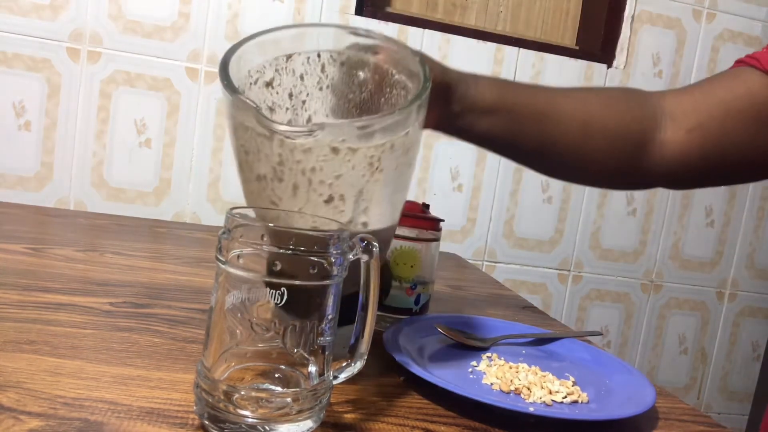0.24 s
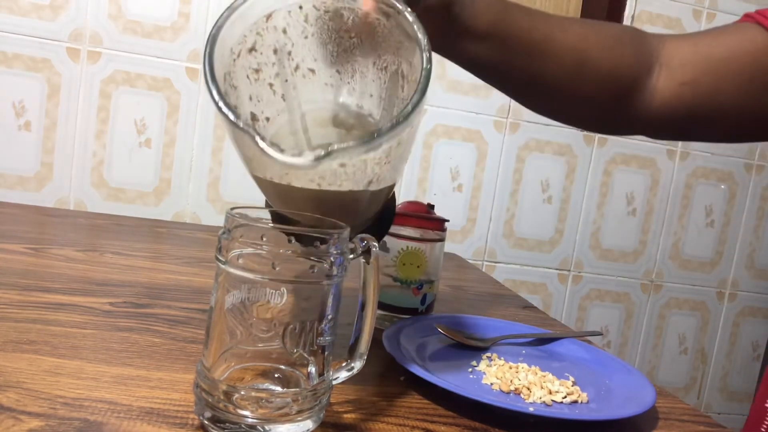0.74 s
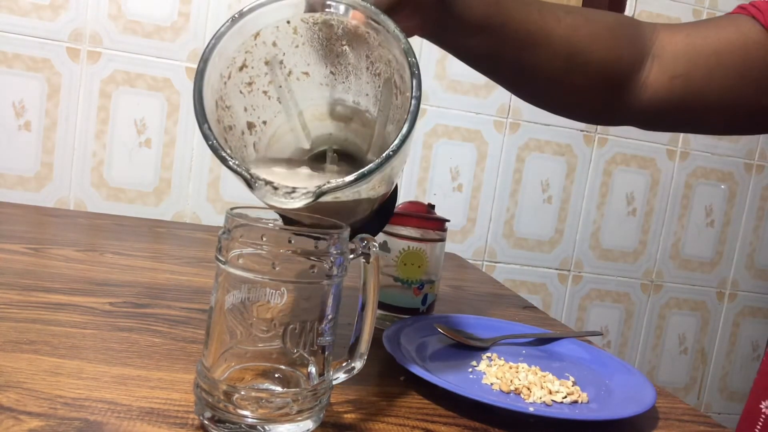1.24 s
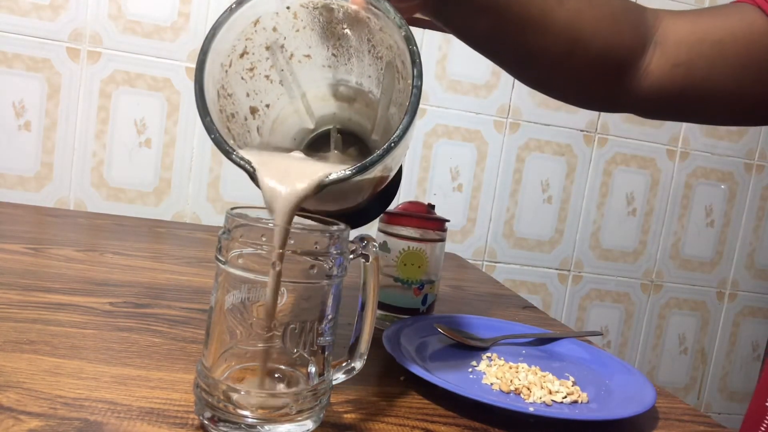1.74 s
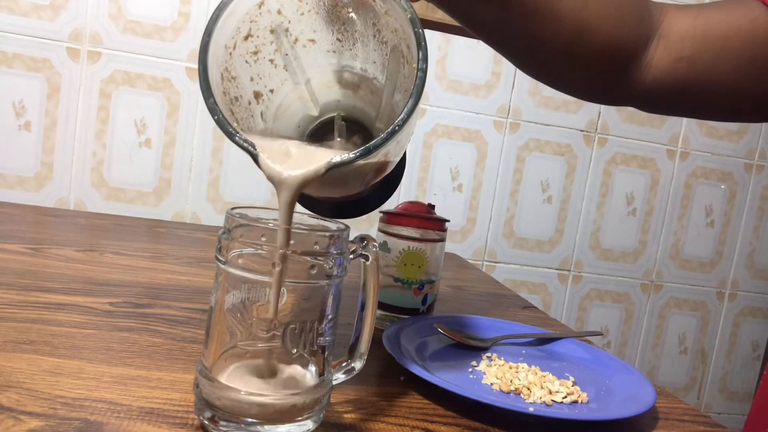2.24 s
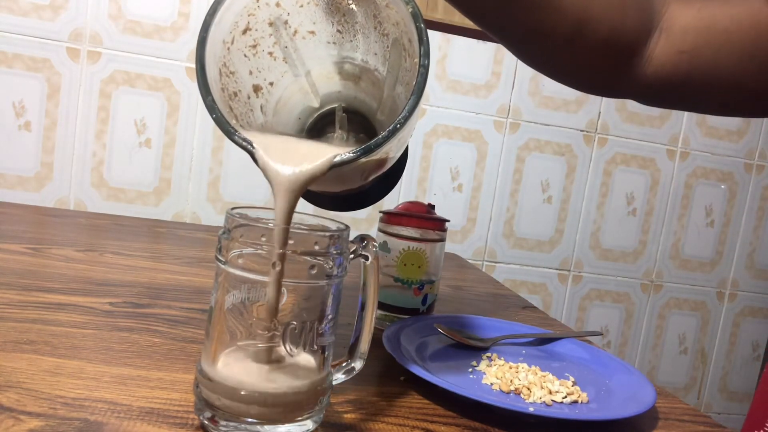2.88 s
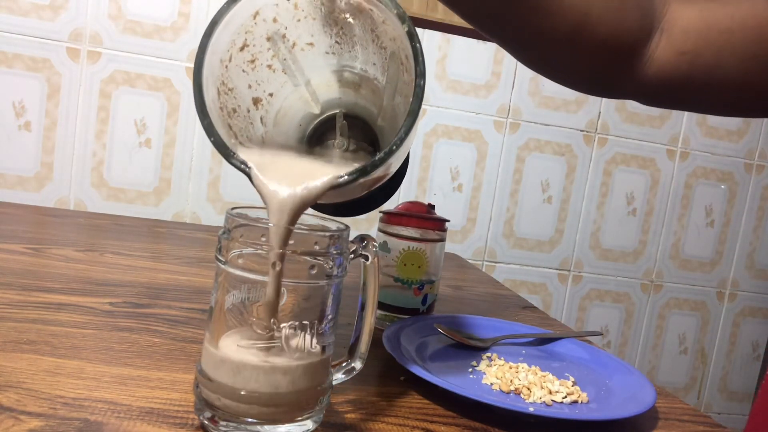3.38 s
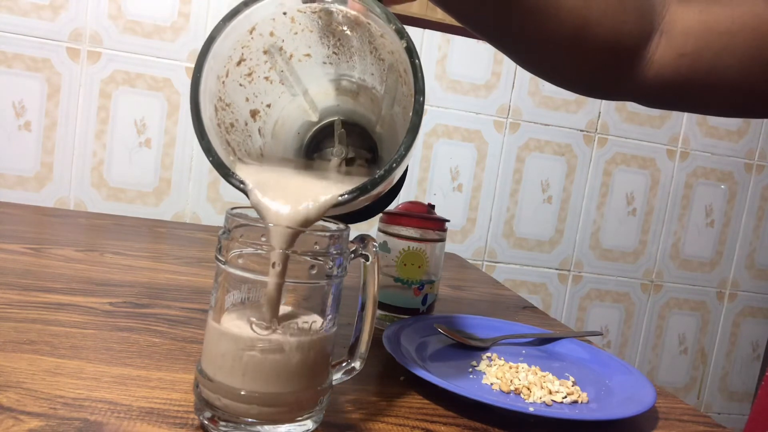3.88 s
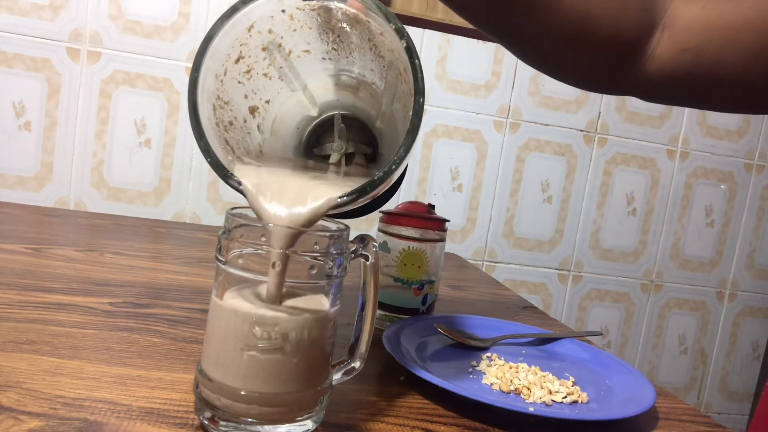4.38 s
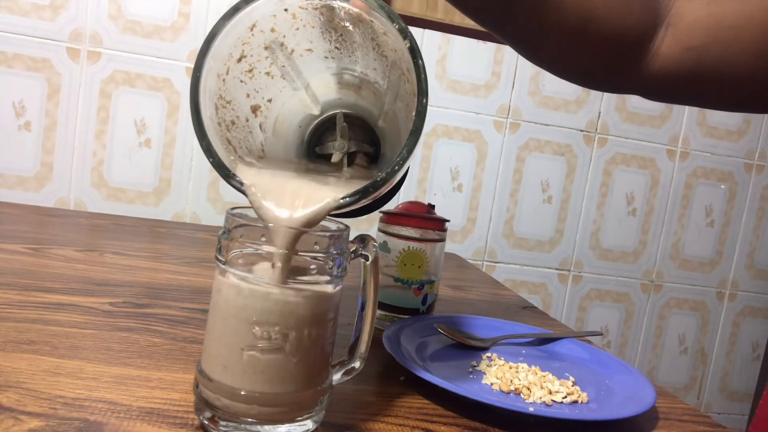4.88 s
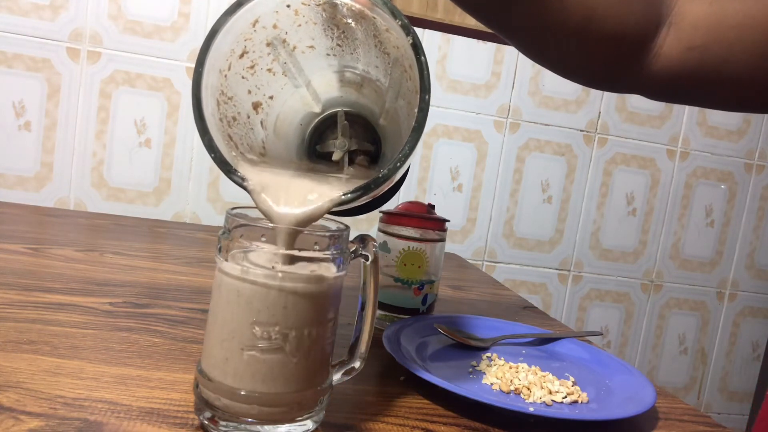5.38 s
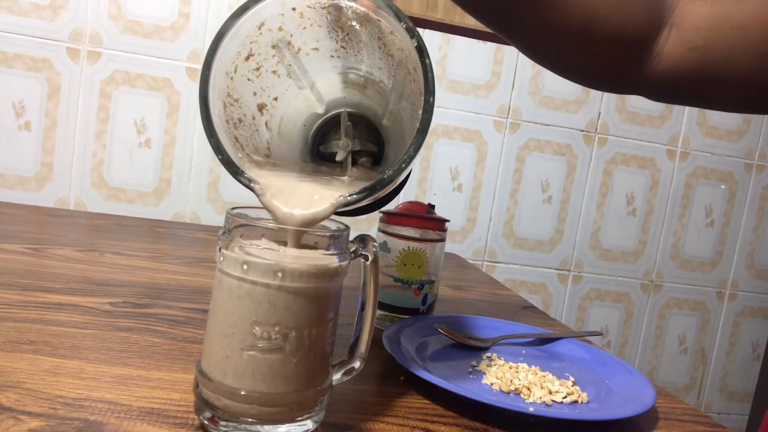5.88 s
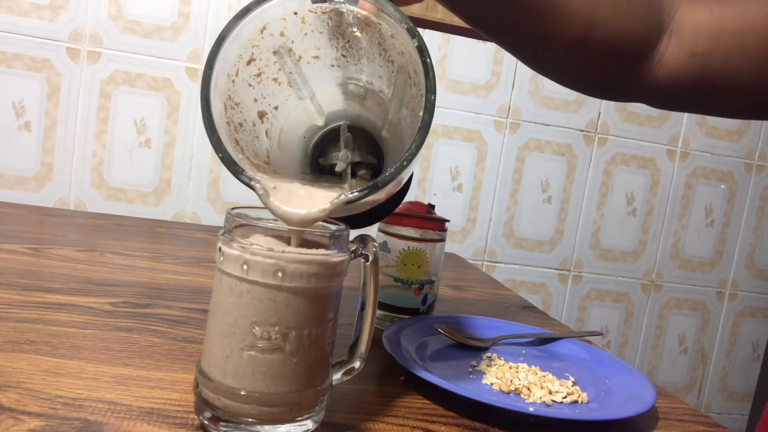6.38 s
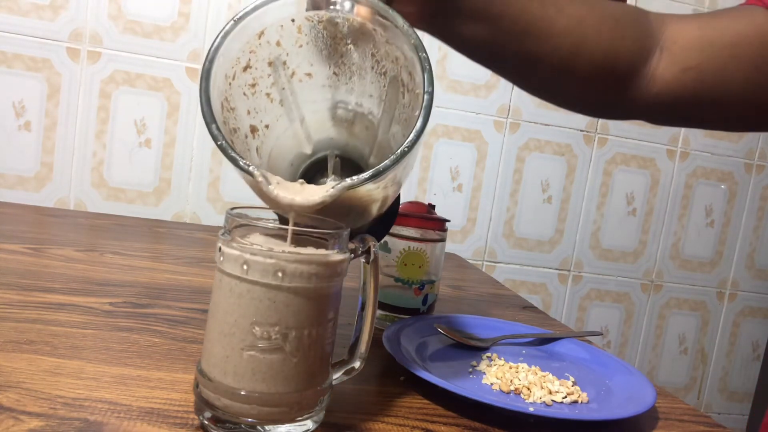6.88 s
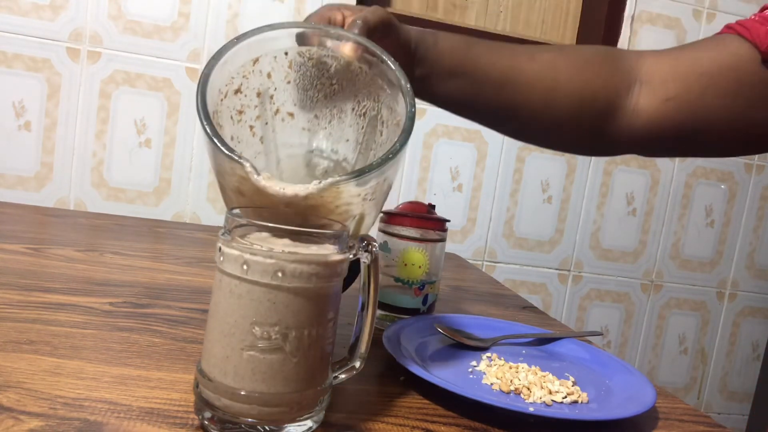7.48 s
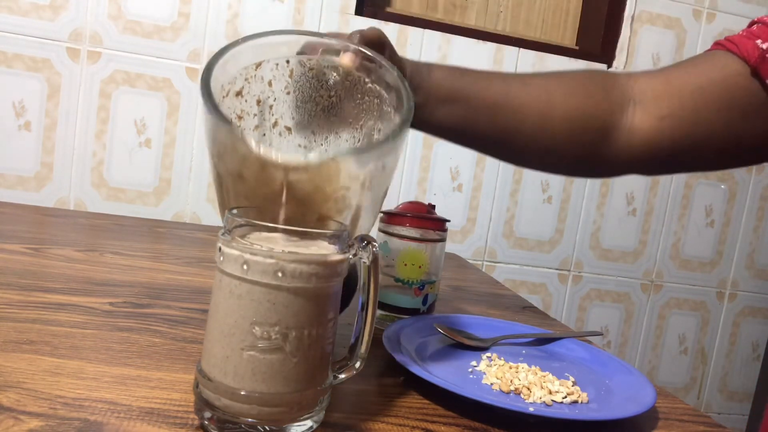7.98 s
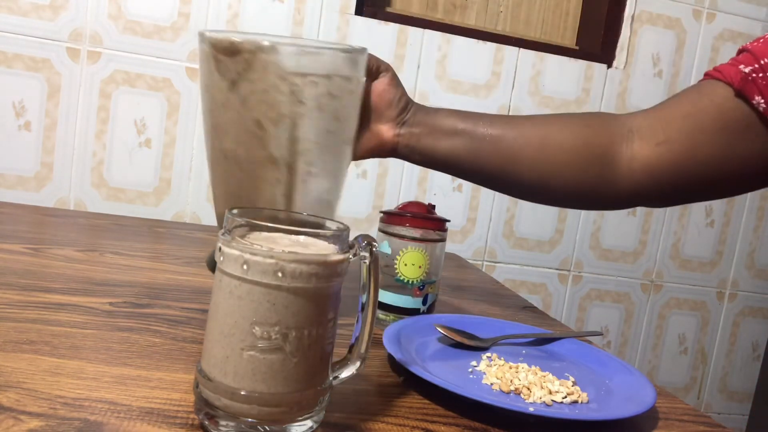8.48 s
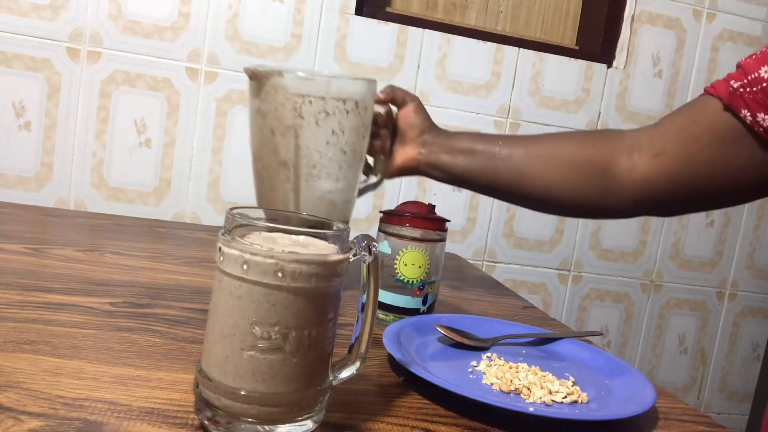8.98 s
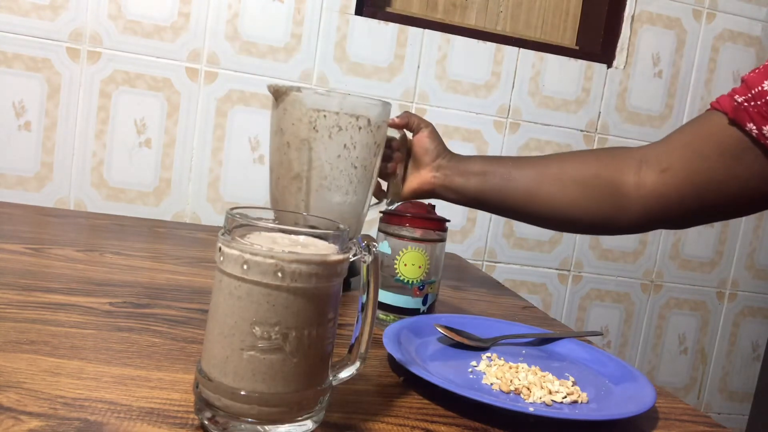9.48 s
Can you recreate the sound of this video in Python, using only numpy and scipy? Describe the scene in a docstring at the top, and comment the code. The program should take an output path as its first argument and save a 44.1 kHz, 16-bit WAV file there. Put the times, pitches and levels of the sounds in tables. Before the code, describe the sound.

In a small tiled kitchen with a steady fridge hum, a heavy glass jug bumps a wooden table, with light glass rattle. Thick drink pours into a glass mug: snapping bubbles, strong hollow gulps, then softer glugs that fade as it fills. A faint low drone remains. Later the jug is lowered with a few knocks and glassy clinks, then set down in a clatter. Close microphone, short bright room echo.

```python
"""A thick shake pours from a blender jug into a glass mug on a wooden table, heard in a tiled kitchen.
Large air pockets in the stream snap as torn fizz and gulp as short swelling notes; small bubbles simmer,
glug and pip, and the stream adds a low drone of filtered noise. The jug knocks as it is lifted, tipped and
set down: each blow is a filtered force that rings table and jug and sets the glass chattering.
Behind are a fridge hum of wavering sine lines, room air and faint far chirps, both made of noise."""
import sys
import numpy as np
from scipy import signal
from scipy.fft import rfft, irfft
from scipy.io import wavfile

SR = 44100
rng = np.random.default_rng(int(sys.argv[2]) if len(sys.argv) > 2 else 0)


def generate_wav(sig):
    """Save sig (samples, or channels by samples) to the path in sys.argv[1] as 16-bit PCM at SR."""
    pcm = np.round(np.clip(np.atleast_2d(sig).T, -1, 1) * 32767).astype(np.int16)
    wavfile.write(sys.argv[1], SR, pcm)


N = 429426
LEAD = SR // 5  # samples of run-in ahead of time zero
SIZE = 32768  # samples in one knock or room response
T, HZ = np.arange(SIZE) / SR, np.fft.rfftfreq(SIZE, 1 / SR)
EDGE_HZ = 15900  # upper band limit

# Levels in the tables are relative within their own layer unless marked rms.
# fridge motor lines: pitch_hz [Hz], level_db [dB rms]
FRIDGE_LINES = [(147.1, -59), (196.2, -56.5), (217, -57.5), (237, -52), (294.3, -48.5), (344, -63),
                (402, -57), (441.4, -41), (490.5, -61), (539.6, -61), (688, -60), (806, -56), (834, -61),
                (1031, -67), (2013, -78), (2209, -68.5), (3339, -70), (3730, -71.5)]
# spectrum of the still room air: frequency_hz [Hz], level_db [dB per Hz]
AIR_SPECTRUM = [(15, -71), (25, -28), (76, -7.5), (180, -7), (285, -7.5), (373, -9), (439, -6.5),
                (503, -8.5), (591, -11.5), (818, -12.5), (887, -13), (1160, -20), (5430, -30), (14800, -42),
                (16000, -41)]
AIR_DB = -44.5  # rms
# faint far chirps: start_s [s], level_db [dB rms at full swell], length_s [s]
FAR_CHIRPS = [(4.01, -62, .25), (4.825, -59.5, 0.32), (5.947, -64, .2), (8.736, -64, 0.26)]

# decay of the tiled room: frequency_hz [Hz], t60_s [s]
ROOM_DECAY = [(100, 0.56), (230, 0.39), (600, 0.7), (1500, 0.85), (4000, 0.75), (8000, 0.76), (15000, 0.23)]
# strength of the room tail: frequency_hz [Hz], level_db [dB re direct sound]
ROOM_LEVEL = [(80, 6.5), (250, -2), (450, 1.5), (800, -7.5), (2000, -3.5), (6000, -10), (15000, -9)]
# near echoes from table and wall: delay_s [s], level_db [dB re direct sound]
NEAR_ECHOES = [(.0045, -26), (.0088, -15), (0.0173, -33)]

# blows of the jug: start_s [s], contact [name], level_db [dB], hardness_hz [Hz, top corner],
# chatter_db [dB], flight_s [s until the jolted glass lands]
JUG_BLOWS = [(-0.06, "bump", -10, 1610, -19.5, .02), (0.258, "tilt", -21, 1000, -35, 0.0015),
             (0.271, "tilt", -6, 388, -21.5, 0.0087), (0.435, "bump", -5.5, 701.3, -17, 0.0095),
             (0.458, "bump", -1.5, 467, -15, 0.0039), (0.477, "bump", -0.5, 720, -13.5, 0.011),
             (0.579, "bump", -14.5, 694, -23.5, 0.0061), (0.702, "bump", -14, 463, -48, 0.0056),
             (1.118, "tilt", -5.5, 363, -24, .018), (1.202, "tilt", -9.5, 700, -22.5, .011),
             (1.307, "tilt", -9, 540, -29.5, .012), (3.912, "rim", -13, 408, -51, 0.0042),
             (6.711, "lower", -12.5, 302.2, -42, 0.0063), (6.721, "lower", -7.5, 765, -20.5, 0.0065),
             (6.748, "lower", -14, 580, -18.5, 0.0033), (6.996, "rim", -3.5, 948, -22, .048),
             (7.150, "rim", -5.5, 831, -19.5, .034), (7.261, "rim", -13.5, 1230, -35, 0.0039),
             (7.337, "rim", -15.5, 1110, -52, 0.0079), (9.122, "stand", -6.5, 2680, -14, 0.026),
             (9.158, "stand", -8, 300, -28, 0.0053), (9.264, "stand", -7.5, 3200, -15.5, .029),
             (9.327, "stand", -8.5, 1420, -13, 0.013), (9.342, "stand", -10.5, 689.7, -19, 0.016),
             (9.395, "stand", -20, 450, -49, .005), (9.498, "stand", -14.5, 1210, -25, .011)]
# how the jug is met, by contact name: lightness_hz [Hz, bottom corner], boom_db [dB], jug_ring_db [dB]
CONTACT_KINDS = {"tilt": (280, 4, -12), "bump": (303, 4.2, -14), "lower": (240, 6.6, -18),
                 "rim": (227, -2, 15.6), "stand": (91, -2.5, 1)}
# modes of the table top: pitch_hz [Hz], level_db [dB], t60_s [s]
TABLE_MODES = [(83.4, 4.5, 0.15), (105.4, -1, 0.3), (115, -2, 0.24), (149.8, 6.5, 0.32), (156.9, 6.5, 0.26),
               (193.2, 2, 0.3), (242.6, 1.5, 0.056), (276.8, 1, 0.3), (327, 2, 0.091), (355.3, 6.5, 0.16),
               (389, -1.5, 0.15), (400, -5.5, 0.07), (489, 6.5, 0.14), (544.5, 0.5, 0.23), (610, -39, 0.29),
               (729, -4.5, 0.47)]
# hollow note of the half-empty jug: pitch_hz [Hz], level_db [dB], t60_s [s]
JUG_BOOM = [(233.6, 10.5, 0.18)]
# modes of the heavy jug: pitch_hz [Hz], level_db [dB], t60_s [s]
JUG_MODES = [(624, 3, 0.036), (1014, -11, 0.32), (1049, -4, 0.088), (1110, -15, 0.29), (1390, -35, 0.066),
             (1710, -28, .1), (1700, -32, .1), (2680, 0, 0.057), (3020, 11, 0.028), (5000, 7, 0.054)]
# modes of glass and jug in the chatter: pitch_hz [Hz], level_db [dB], t60_s [s]
GLASS_MODES = [(2458, 4, 0.054), (2600, -10, 0.1), (2669, 4.5, 0.13), (3186, -1.5, 0.19), (3540, -8, .08),
               (3960, 7, 0.078), (3950, 0, 0.078), (4200, -35, 0.069), (4627, 14, 0.034),
               (4760, -17, 0.045), (5750, -21, 0.085), (5220, 4, 0.053), (6140, -7.5, 0.19),
               (6610, -6.5, 0.11), (7430, -1, 0.12), (7850, -2.5, 0.095), (8800, -16.5, 0.075),
               (9200, -20, 0.14), (9620, -53, .08), (10220, -4, 0.066), (10900, -8, 0.059),
               (13100, -13, .07), (12930, -14, 0.12), (13190, -19, 0.057)]
# colour of a hard glass contact: frequency_hz [Hz], level_db [dB]
CRACK_SPECTRUM = [(900, 3), (2000, 3.5), (3900, 6.5), (4300, -19), (4650, 6), (5400, 7), (6200, -5),
                  (7500, -2), (9500, -6.5), (13300, -25), (15000, -45)]
# the jolted glass grazes its support until it lands, then rebounds, ever weaker
GRAZE_GAP_S, GRAZE_DB, BOUNCE_GAP_S, BOUNCE_LOSS_DB = .012, -8, .009, 10

# modes of the air in the mug and its wall: pitch_hz [Hz], level_db [dB], t60_s [s]
MUG_MODES = [(685, -14, 0.093), (1307, 14, 0.016), (1514, 12, 0.017), (2000, 5, 0.022), (2650, -30, 0.013),
             (3240, 2, 0.043), (6040, 0, 0.018)]
# large bursting pockets: start_s [s], snap_db [dB], snap_centre_hz [Hz], snap_length_s [s],
# gulp_db [dB peak], gulp_pitch_hz [Hz], swell_s [s]
AIR_POCKETS = [(2.093, -23.5, 3170, 0.0023, -31, 682, 0.0048),
               (2.408, -33.5, 2740, 0.003, -30.5, 732, 0.0042),
               (2.544, -43.5, 3130, .0043, -25, 766, .0028),
               (2.609, -27.5, 3840, 0.0055, -8.5, 818, 0.0022),
               (2.627, -26, 5440, 0.0045, -6, 725.6, 0.0056),
               (2.727, -39.5, 3950, .0024, -6.5, 747, 0.0038),
               (2.7845, -39, 2830, 0.0023, -3.5, 722, 0.0022), (2.896, -50, 2500, .005, -6.5, 740, 0.0017),
               (2.9588, -20, 4970, 0.0015, -1, 780, 0.0016), (3.235, -44.5, 3830, .003, -23, 827, 0.0026),
               (3.278, -45.5, 3380, 0.0029, -17.5, 783, 0.001), (3.3424, -18, 5470, 0.0026, 1, 807, 0.0028),
               (3.578, -49, 2990, .002, -15.5, 858, 0.0042), (3.646, -32, 5700, 0.0024, -21, 997, 0.0016),
               (3.848, -43.5, 4870, .003, -20, 880, 0.0011),
               (4.244, -35.5, 3080, 0.0038, -22.5, 1000, 0.0012),
               (4.398, -51, 3000, 0.0022, -34, 1070, 0.0015), (4.582, -47, 8000, 0.0023, -41, 1120, 0.0016)]
# small bubbles with a clean high pip: start_s [s], level_db [dB peak], pitch_hz [Hz]
SMALL_PIPS = [(1.989, -30, 2020), (2.282, -29, 5520), (2.325, -34.5, 3250)]
# the stream reaches the mug, bubbles for a while, and runs on smoothly until the jug is raised
POUR_START_S, BUBBLING_S, POUR_END_S = 2.1, 2.5, 6.15
# the air above the drink shortens, so its note rises and the mug rings less
EMPTY_NOTE_HZ, FILL_SHARE_PER_S, NOTE_SCATTER = 673, 0.168, .04
MUG_RING_DB, MUG_DAMPING_DB_PER_S = -30, 6
# as the drink deepens, gulps gain a lower second note that sinks
UNDERTONE_FROM_S, UNDERTONE_GROW_S, UNDERTONE_SWELL_S = 2.68, 0.66, 0.0035
UNDERTONE_HZ, UNDERTONE_SINK_OCTAVES_PER_S, UNDERTONE_DB = 658, 1.2, -11


def amp(db):
    """Turns decibels into gain."""
    return 10 ** (np.asarray(db) / 20)


def unit(x):
    """Scales a sound to rms 1."""
    return x / np.sqrt(np.mean(x ** 2) + 1e-20)


def read(points, hz):
    """Reads a table of values on a log-frequency axis."""
    f, value = np.transpose(points)
    return np.interp(np.log(hz + 1), np.log(f + 1), value)


def add(mix, s, sound):
    """Mixes a sound in at time s; tracks begin LEAD samples early."""
    part = mix[max(round(s * SR) + LEAD, 0):][:len(sound)]
    part += sound[:len(part)]


def noise(gain_at):
    """Steady noise whose spectrum is a function of frequency."""
    length = 2 ** 19
    white = rfft(rng.standard_normal(length))
    return unit(irfft(white * gain_at(np.fft.rfftfreq(length, 1 / SR)))[:N])


def drift(rate):
    """Slow random wander between unit-variance points, 2 * rate of them a second."""
    knots = np.arange(int(N / SR * 2 * rate) + 2) / (2 * rate)
    return np.interp(np.arange(N) / SR, knots, rng.standard_normal(len(knots)))


def ringing(modes):
    """Spectrum of a struck set of decaying modes."""
    return rfft(sum(amp(db - 60 * T / t60) * np.cos(2 * np.pi * hz * T) for hz, db, t60 in modes))


def background(waver_hz=0.66, flutter_db=1.0):
    """Fridge lines, wavering slightly in pitch and level, over the still air of the room."""
    hum = np.zeros(N)
    for hz, db in FRIDGE_LINES:
        turns = np.cumsum(hz + waver_hz * drift(3)) / SR
        level = amp(db + flutter_db * drift(6))
        hum += level * np.sqrt(2) * np.sin(2 * np.pi * turns)
    return hum + amp(AIR_DB) * noise(lambda hz: amp(read(AIR_SPECTRUM, hz)))


def chirps(centre_hz=3340, width_hz=70):
    """Thin trembling chirps, far away: a narrow noise band swelled in and out."""
    level = np.zeros(N + LEAD)
    for s, db, length_s in FAR_CHIRPS:
        add(level, s, amp(db) * signal.windows.tukey(int(length_s * SR), .5))
    return level[LEAD:] * noise(lambda hz: 1 / (1 + ((hz - centre_hz) / width_hz) ** 2))


def kitchen(x, build_s=0.003):
    """Direct sound and a few near echoes, then a tiled-room tail that dies band by band."""
    hz, t, z = signal.stft(rng.standard_normal(SIZE), SR, nperseg=256)
    t60 = read(ROOM_DECAY, hz)[:, None]
    decay = amp(read(ROOM_LEVEL, hz)[:, None] - 60 * t / t60)
    even_energy = np.sqrt(2 * np.log(1000) / (t60 * SR))  # tail energy set by level, not by length
    tail = signal.istft(z * decay * even_energy, SR, nperseg=256)[1][:SIZE]
    response = tail * (1 - np.exp(-(T / build_s) ** 2))
    response[0] += 1  # direct path to the microphone
    for s, db in NEAR_ECHOES:
        response[round(s * SR)] += amp(db)
    return signal.oaconvolve(x, response)[LEAD:LEAD + N]


def knocks(level_db=32, table_db=-49, boom_db=-47, jug_db=-47, scatter_db=-2, scatter_t60=0.12,
           spread=0.1069, dull_hz=4800):
    """Each blow crosses the table as a bending wave, scatters off the edges, and rings table and jug."""
    out = np.zeros(N + LEAD)
    table = amp(table_db) * ringing(TABLE_MODES)
    boom = amp(boom_db) * ringing(JUG_BOOM)
    jug = amp(jug_db) * ringing(JUG_MODES)
    # bending waves arrive treble first: delay is spread * (1 / sqrt(f) - 1 / sqrt(SR / 2))
    bending = np.exp(-4j * np.pi * spread * (np.sqrt(HZ) - HZ / (2 * np.sqrt(SR / 2))))
    # wood soaks up the treble
    wood = (1 + 1j * HZ / 2500) / (1 + 1j * HZ / 900) / (1 + (HZ / dull_hz) ** 4)
    for s, contact, db, top_hz, _, _ in JUG_BLOWS:
        bottom_hz, boom_ring_db, jug_ring_db = CONTACT_KINDS[contact]
        build = 1 - np.exp(-T / 0.00057)
        scatter = rfft(rng.standard_normal(SIZE) * amp(-60 * T / scatter_t60) * build)
        scatter = amp(scatter_db) * scatter / np.linalg.norm(scatter)
        low = 1j * HZ / bottom_hz
        thin = low ** 2 / (1 + np.sqrt(2) * low + low ** 2)  # light contacts lack bass
        force = thin / (1 + 1j * HZ / top_hz) ** 2  # soft contacts lack treble
        body = 1 + scatter + table + amp(boom_ring_db) * boom + amp(jug_ring_db) * jug
        add(out, s, amp(level_db + db) * irfft(force * wood * bending * body))
    return out


def glass_contacts(count=2):
    """Times and levels of the chatter after each blow: grazes, the landing, and rebounds."""
    for s, _, _, _, db, flight_s in JUG_BLOWS:
        slip = rng.uniform(-.25, .25, 16)  # uneven timing, in shares of a gap
        grazes = np.arange(0, flight_s - GRAZE_GAP_S / 2, GRAZE_GAP_S)[:len(slip)]
        for k, lag in enumerate(grazes):
            yield s + lag + GRAZE_GAP_S * abs(slip[k]), db + GRAZE_DB
        yield s + flight_s, db
        for k in range(1, count + 1):
            yield s + flight_s + BOUNCE_GAP_S * (k + slip[-k]), db - BOUNCE_LOSS_DB * k


def chatter(ring_db=-14, crack_db=2, crack_t60=0.016, rebound_db=-7, rebound_s=.003, wander=0.0023):
    """Hard little contacts crack and ring glass modes weighted by where they land; each rebounds as a crack."""
    out, t = np.zeros(N + LEAD), T[:SIZE // 4]
    hz, mode_db, t60 = np.transpose(GLASS_MODES)[:, :, None]
    decays = amp(mode_db - 60 * t / t60)
    colour = amp(read(CRACK_SPECTRUM, np.fft.rfftfreq(len(t), 1 / SR)))
    for s, db in glass_contacts():
        weight, phase, load = rng.random((3, len(GLASS_MODES), 1))
        turns = hz * (1 + wander * (2 * load - 1)) * t + phase
        ring = ((0.18 + 0.78 * weight) * decays * np.cos(2 * np.pi * turns)).sum(0)
        rebound = (rebound_s * (.5 + rng.random()), rebound_db, 0)
        for delay, drop_db, ring_share in ((0, 0, 1), rebound):
            crack = unit(irfft(rfft(rng.standard_normal(len(t))) * colour)) * amp(-60 * t / crack_t60)
            contact = ring_share * amp(ring_db) * ring + amp(crack_db) * crack
            add(out, s + delay, amp(db + drop_db) * contact)
    return out


def stream(centre_hz=100, width_hz=9, level_db=-51, attack_s=1.0, release_s=0.29):
    """The thick stream lands with a soft low drone that swells, holds and stops."""
    t = np.arange(N) / SR
    level = np.clip(np.minimum((t - POUR_START_S) / attack_s, (POUR_END_S - t) / release_s), 0, 1)
    return amp(level_db) * level * noise(lambda hz: 1 / (1 + ((hz - centre_hz) / width_hz) ** 2))


def gulp(hz, swell, steepness=0.78, bend=0.0041):
    """An opened pocket swells into a short note, bending slightly up, quickly damped by the thick liquid."""
    u = T[:SIZE // 8] / swell
    turns = np.cumsum(hz * (1 + bend * np.tanh(u - 1))) / SR
    return (u * np.exp(1 - u)) ** steepness * np.sin(2 * np.pi * turns)


def undertone_hz(s):
    """Pitch of the sinking second note at time s."""
    return UNDERTONE_HZ / 2 ** (UNDERTONE_SINK_OCTAVES_PER_S * (s - UNDERTONE_FROM_S))


def simmer(level_db=-31, fade_db=20, swell_s=0.0045, count=60):
    """Small bubbles of uneven strength, fading overall, sound around the rising note of the mug."""
    out = np.zeros(N + LEAD)
    for k, (when, loud, tune) in enumerate(rng.random((count, 3))):
        age = BUBBLING_S * (k + when) / count
        mug_note_hz = EMPTY_NOTE_HZ / (1 - FILL_SHARE_PER_S * age)
        hz = mug_note_hz * (1 + NOTE_SCATTER * (2 * tune - 1))
        level = loud * amp(level_db - fade_db * (age / BUBBLING_S) ** 2)
        add(out, POUR_START_S + age, level * gulp(hz, swell_s))
    return out


def glugs(level_db=-24, range_db=8, fade_db_per_s=9, start_s=2.95, length_s=1.05, depth_octaves=0.78,
          swell_s=0.0066, count=14):
    """Air folded under the surface glugs softly, at or below the undertone."""
    out = np.zeros(N + LEAD)
    for k, (when, weak, deep) in enumerate(rng.random((count, 3))):
        age = length_s * (k + when) / count
        hz = undertone_hz(start_s + age) / 2 ** (depth_octaves * deep ** 2)
        level = amp(level_db - range_db * weak - fade_db_per_s * age)
        add(out, start_s + age, level * gulp(hz, swell_s))
    return out


def pips(swell_s=.0012):
    """Short bright notes of small bubbles on the bare glass."""
    out = np.zeros(N + LEAD)
    for s, db, hz in SMALL_PIPS:
        add(out, s, amp(db) * gulp(hz, swell_s))
    return out


def tear(centre_hz, length_s, sharpness=1.01, spatter_db=-30, spatter_s=0.0056):
    """A bubble skin tears in a few milliseconds of fizz, with a faint spatter after."""
    t = T[:SIZE // 16]
    hz = np.fft.rfftfreq(len(t), 1 / SR) + 1
    colour = 1 / np.hypot(1, sharpness * (hz / centre_hz - centre_hz / hz))
    fizz = unit(irfft(rfft(rng.standard_normal(len(t))) * colour))
    return fizz * (np.exp(-(t / length_s) ** 2) + amp(spatter_db) * np.exp(-t / spatter_s))


def snaps(level_db=2, tick_db=-33, tick_hz=4600, tick_s=0.0022, range_db=10, fade_db_per_s=8,
          crowding=2.3, count=44):
    """Large bubbles snap and tiny ones tick, most as the stream first wets the glass; all ring in the mug."""
    out = np.zeros(N + LEAD)
    for s, db, centre_hz, length_s, *_ in AIR_POCKETS:
        add(out, s, amp(level_db + db) * tear(centre_hz, length_s))
    for k, (when, weak, octaves) in enumerate(rng.random((count, 3))):
        age = BUBBLING_S * ((k + when) / count) ** crowding
        level = amp(tick_db - range_db * weak - fade_db_per_s * age)
        add(out, POUR_START_S + age, level * tear(tick_hz * 2 ** (octaves - .5), tick_s))
    age = np.maximum(np.arange(-LEAD, N) / SR - POUR_START_S, 0)
    mug_drive = out * amp(MUG_RING_DB - MUG_DAMPING_DB_PER_S * age)
    return out + signal.oaconvolve(mug_drive, irfft(ringing(MUG_MODES)))[:len(out)]


def gulps():
    """Each large pocket gulps in the mug, the later ones with an undertone."""
    out = np.zeros(N + LEAD)
    for s, *_, db, hz, swell in AIR_POCKETS:
        depth = np.clip((s - UNDERTONE_FROM_S) / UNDERTONE_GROW_S, 0, 1)
        undertone = depth * amp(UNDERTONE_DB) * gulp(undertone_hz(s), UNDERTONE_SWELL_S)
        add(out, s, amp(db) * (gulp(hz, swell) + undertone))
    return out


def scene():
    """Jug, glass and liquid sound in the kitchen; drone, chirps and background join without its echo."""
    liquid = simmer() + glugs() + pips() + snaps() + gulps()
    in_room = kitchen(knocks() + chatter() + liquid)
    return (background() + chirps() + stream() + in_room)[None]


def record(dry):
    """The microphone signal: loudest peaks rounded off at full scale, then the band limit."""
    held = dry / (1 + dry ** 8) ** (1 / 8)
    band_limit = signal.firwin(511, EDGE_HZ, window=("kaiser", 9), fs=SR)
    return signal.oaconvolve(held, band_limit[None], "same")


dry = scene()
out = record(dry)
generate_wav(out)
```